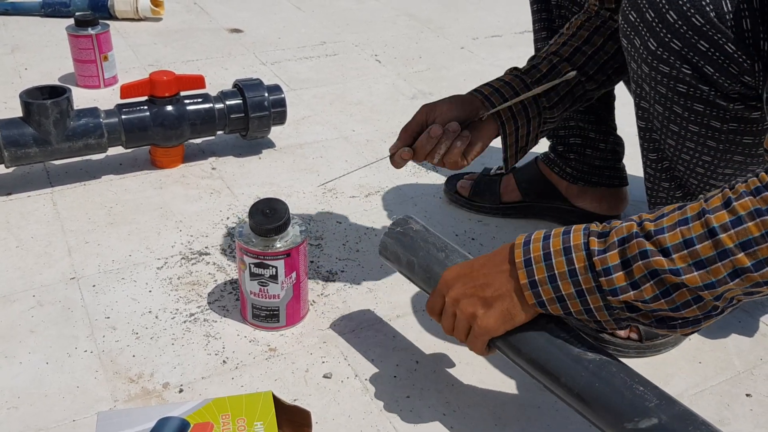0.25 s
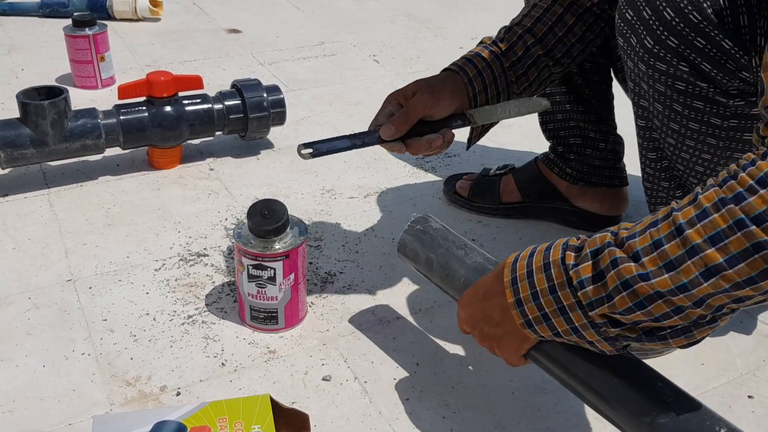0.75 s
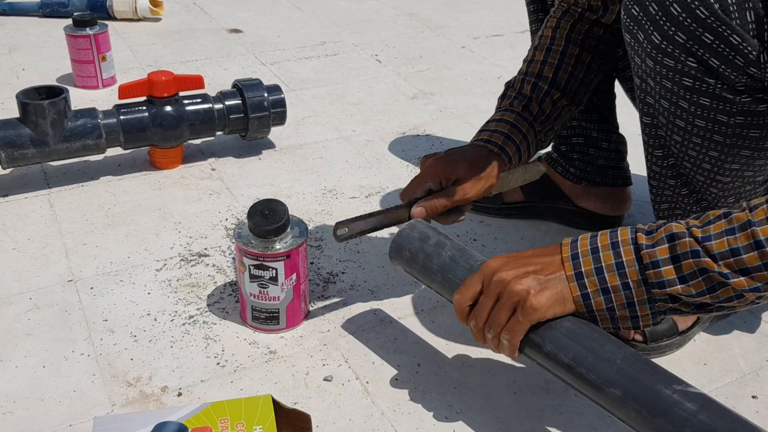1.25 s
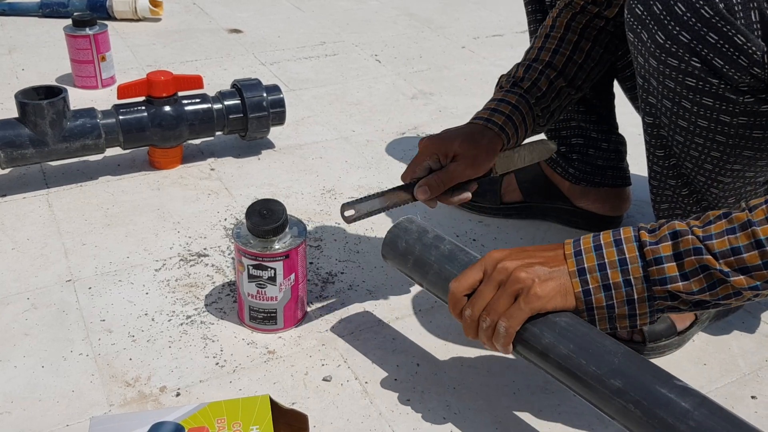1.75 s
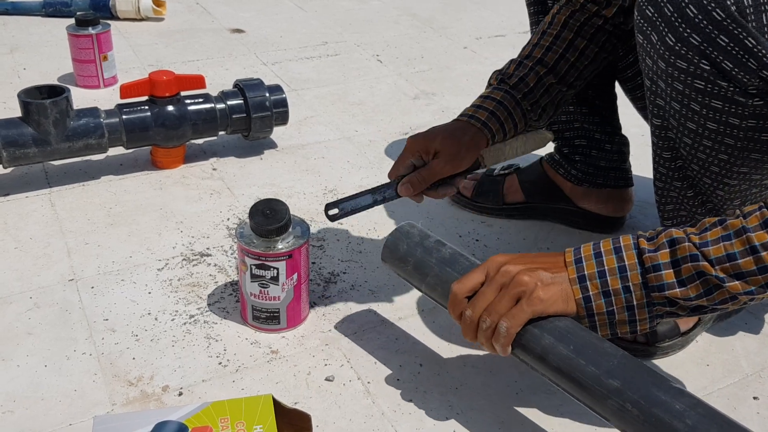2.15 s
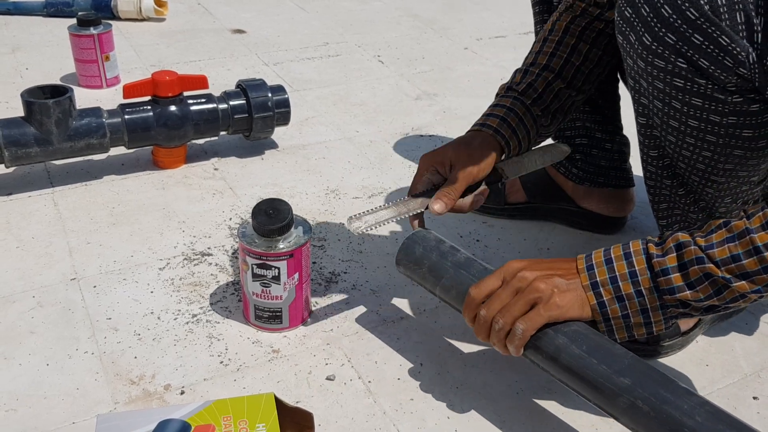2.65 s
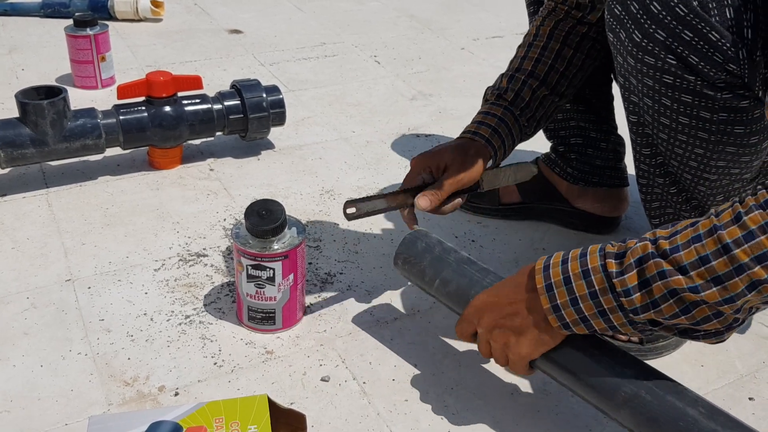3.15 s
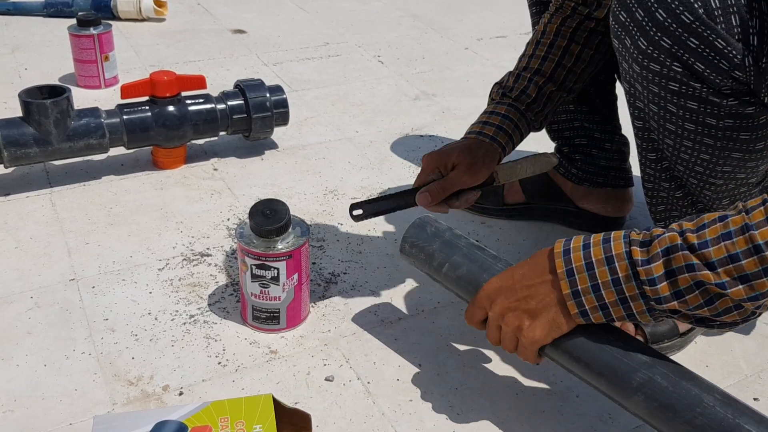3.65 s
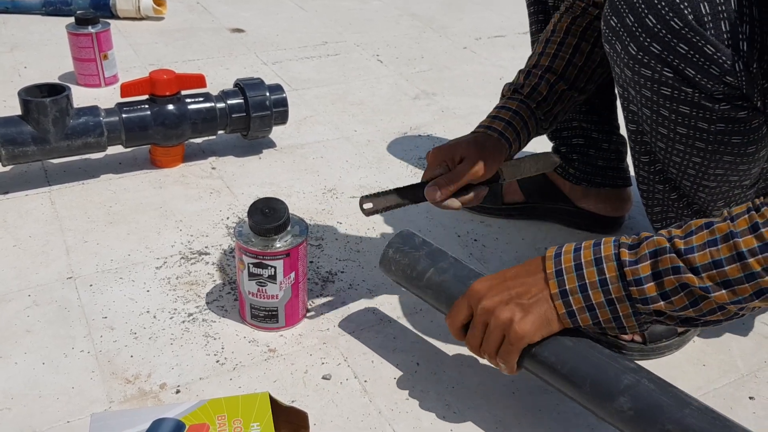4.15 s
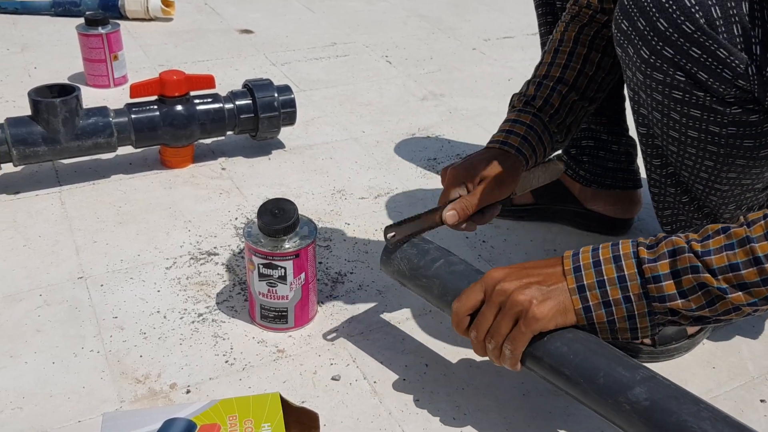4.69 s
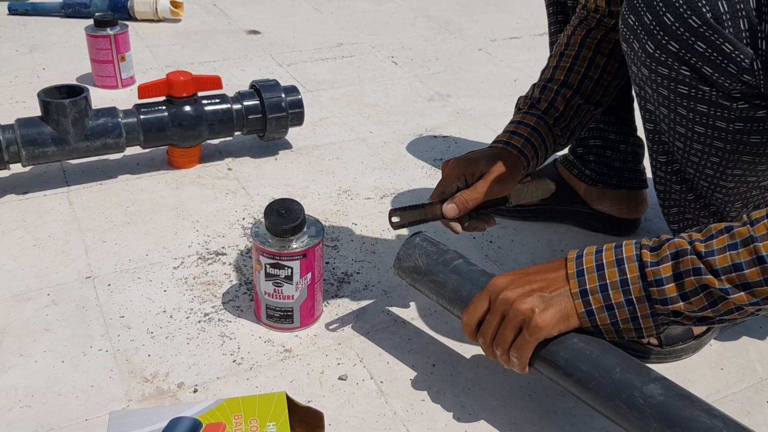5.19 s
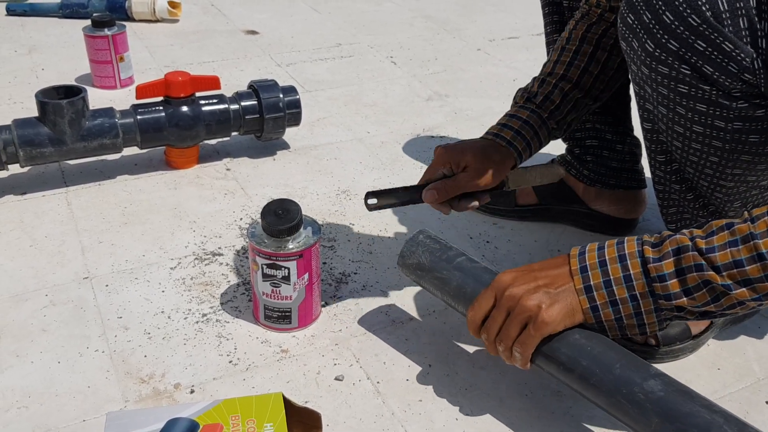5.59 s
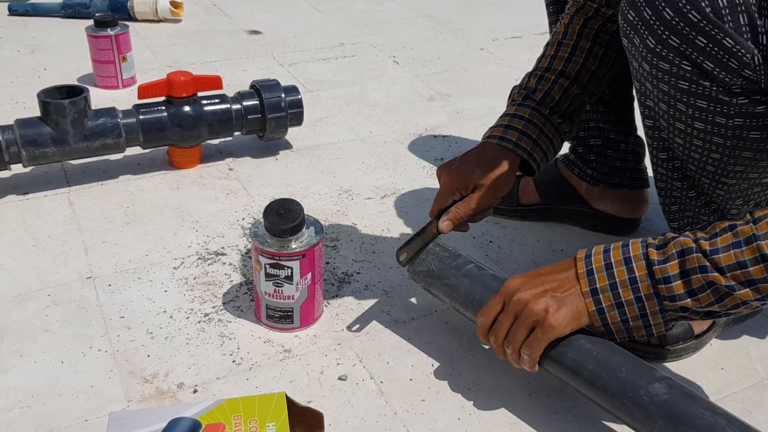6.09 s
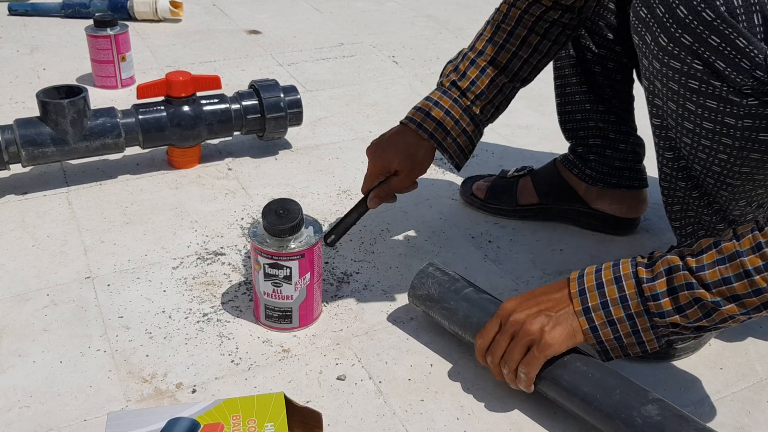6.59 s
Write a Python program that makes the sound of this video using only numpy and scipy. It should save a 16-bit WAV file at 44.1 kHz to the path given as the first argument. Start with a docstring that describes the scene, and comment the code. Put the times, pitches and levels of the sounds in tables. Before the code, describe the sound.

On an open rooftop, a loose saw blade deburrs a plastic pipe end. Each pass is a dull tap with a bright click, then a very short hissing scrape, sometimes a squeak and a thin metallic ring. The pipe clacks hollowly on concrete early and again near five seconds. Soft hand brushing, steady low hum and faint bird whistles lie around it. Close stereo microphone, slight short echo.

```python
"""Open rooftop: a loose hacksaw blade deburrs the sawn end of a plastic pipe.
The blade taps the rim, shaves it in noisy grains, at times squeaks, and rings as decaying modes once free.
The pipe knocks and booms on the concrete as filtered bursts and modes; a hand brushes along it.
Machine hum, fan drone, rumble and far hiss lie below; a distant bird gives falling, wavering sines."""
import sys
import numpy as np
from scipy import signal
from scipy.fft import rfft, irfft, next_fast_len
from scipy.io import wavfile
from scipy.ndimage import uniform_filter1d

SR = 44100
rng = np.random.default_rng(int(sys.argv[2]) if len(sys.argv) > 2 else 0)


def digitize_waveform(pressure):
    """Quantize a signal to 16-bit integers and store it at the path in sys.argv[1].

    Rows of a 2-D input are taken as channels; values are limited to [-1, 1].
    """
    field = np.atleast_2d(pressure).T
    bounded = np.clip(field, -1, 1)
    quanta = np.round(bounded * 32767).astype(np.int16)
    wavfile.write(sys.argv[1], SR, quanta)


N = 301203
TIME_S = np.arange(N) / SR


def undb(db):
    """Amplitude ratio from dB."""
    return 10 ** (np.asarray(db) / 20)


def unit(x):
    """Scale to an rms of 1."""
    return x / np.sqrt(np.mean(x ** 2))


def span(length_s):
    """Sample times from 0, in s."""
    return np.arange(int(length_s * SR)) / SR


def curve(rows):
    """Straight lines through (t/s, value) rows."""
    return np.interp(TIME_S, *np.transpose(rows))


def add(out, start_s, x, pan_db=0):
    """Mix x in at start_s; pan_db is left minus right."""
    i = max(int(start_s * SR), 0)
    x = x[..., :N - i]
    out[:, i:i + x.shape[-1]] += x * undb(np.array([[pan_db], [-pan_db]]) / 2)


def colour(x, points, tilt_db=0):
    """Minimum-phase filter through (f/Hz, level/dB) points, tilted by tilt_db per octave."""
    n = 2 * next_fast_len(x.shape[-1])
    hz, db = np.transpose(points)
    octave = np.log2(np.maximum(np.fft.rfftfreq(n, 1 / SR), 1))
    octaves_below = np.maximum(np.log2(hz[0]) - octave, 0)
    tilted_db = db + tilt_db * np.log2(hz / hz.mean())
    gain_db = np.interp(octave, np.log2(hz), tilted_db) - 10 * octaves_below
    # folding the cepstrum makes the filter causal
    cepstrum = irfft(np.log(undb(gain_db)))
    cepstrum[1:n // 2] *= 2
    cepstrum[n // 2 + 1:] = 0
    return irfft(rfft(x, n) * np.exp(rfft(cepstrum)))[..., :x.shape[-1]]


def walk(rate_hz, n):
    """Smooth random wander, rms near 1, a new target rate_hz times a second."""
    k = max(int(SR / rate_hz), 1)
    steps = np.repeat(rng.standard_normal(n // k + 3), k)
    return unit(uniform_filter1d(steps, k))[k:n + k]


def air(n, bass_width=0.26, wide_hz=1100):
    """Stereo noise: alike in the bass, unrelated in the treble."""
    mid, side = rng.standard_normal((2, n))
    hz = np.fft.rfftfreq(n, 1 / SR)
    side = irfft(rfft(side) * np.minimum(bass_width + (hz / wide_hz) ** 2, 1), n)
    return np.array([mid + side, mid - side])


def fade(t, t60_s):
    """Exponential decay, -60 dB at t60_s."""
    return np.exp(-np.log(1000) * t / t60_s)


def ring(modes, t, scatter, spread_rad):
    """Decaying modes, slightly detuned; neighbours swing in opposite senses, channels out of phase."""
    out = 0
    for k, (hz, db, t60_s) in enumerate(modes):
        sign = (-1) ** k
        lag_rad = sign * spread_rad * np.array([[1], [-1]])
        detuned_hz = hz * (1 + scatter * rng.standard_normal())
        out = out + sign * undb(db) * fade(t, t60_s) * np.sin(2 * np.pi * detuned_hz * t + lag_rad)
    return out


def blow(x, db):
    """Set the rms of the first 5 ms."""
    return x * undb(db) / np.sqrt(np.mean(x[:, :SR // 200] ** 2))


def crack(t, t60_s, tail_db, tail_t60_s, snap=0):
    """Contact: a one-sample push, a short noise burst and its scatter inside the pipe."""
    return snap * (t == 0) + air(len(t)) * (fade(t, t60_s) + undb(tail_db) * fade(t, tail_t60_s))


# machine hum: f/Hz, level/dB, unsteadiness
HUM_TONES = [(99, -42, 0.44), (79, -49, 0.4), (194.6, -45.5, 0.19), (246.1, -55, 0.54), (492, -68, 1)]
# fan drone spectrum: f/Hz, level/dB
DRONE_SPECTRUM = [(100, -32.5), (170, 1), (215, 4), (250, 7.5), (300, 4), (400, -19), (470, -4),
                  (600, -26.5), (720, -4), (1100, -36.5)]
# fan drone: t/s, level/dB
DRONE_LEVEL = [(0, -45), (1.14, -42.5), (3.1, -49), (4.2, -44), (5.8, -47.5), (6.83, -47)]
# low rumble before swells: t/s, level/dB
RUMBLE_LEVEL = [(0, -43), (1, -46.5), (3.6, -50), (3.9, -41.5), (4.3, -36), (4.7, -47.5), (6.83, -52.5)]
# town noise spectrum: f/Hz, level/dB
TOWN_SPECTRUM = [(22, -21), (40, -7), (70, -1.5), (120, -2.5), (150, -8), (210, -3.5), (430, -16.5),
                 (720, -18.5), (1150, -26.5), (1500, -33), (2100, -34), (2700, -49.5), (6000, -60),
                 (16000, -83)]
# distant hiss spectrum: f/Hz, level/dB
HISS_SPECTRUM = [(2000, 3), (3000, 2), (4500, 0.5), (6500, -0.5), (9000, -7), (14000, -13), (16000, -25)]
# distant hiss: t/s, level/dB
HISS_LEVEL = [(0, -60.3), (2, -61.8), (3.5, -63.3), (6.83, -62.3)]
RUMBLE_SWELL_DB, RUMBLE_SWELL_HZ = 2, 10


def background():
    """Motors hum as wavering sines under fan drone; rumble swells, the town hisses far off."""
    hum = 0
    for hz, db, unsteady in HUM_TONES:
        sway = 1 + unsteady * (walk(11, N) + 1j * walk(12, N))
        hum = hum + undb(db) * unit(np.real(sway * np.exp(2j * np.pi * hz * TIME_S)))
    drone = unit(colour(air(N), DRONE_SPECTRUM)) * undb(curve(DRONE_LEVEL))
    rumble_points = [(22, -18), (42, -8), (62, 3), (85, 0), (140, -5.5), (400, -80), (2000, -101)]
    rumble = unit(colour(air(N, bass_width=0.43), rumble_points))
    rumble *= undb(curve(RUMBLE_LEVEL) + RUMBLE_SWELL_DB * walk(RUMBLE_SWELL_HZ, N))
    town = unit(colour(air(N), TOWN_SPECTRUM)) * undb(-43)
    hiss = unit(colour(air(N), HISS_SPECTRUM)) * undb(curve(HISS_LEVEL))
    lean_left = undb(np.array([[1], [-1]]))
    return (hum + rumble) * lean_left + drone + town + hiss


# bird whistles: t/s, level/dB
WHISTLES = [(.07, -57.5), (.935, -57.5), (1.91, -55), (2.71, -55.5), (3.75, -62)]
WHISTLE_S, WHISTLE_FROM_HZ, WHISTLE_TO_HZ = .16, 4850, 3850


def bird():
    """Thin falling sines, loudest near the start, blurred in pitch and broken in level by distance."""
    out = np.zeros((2, N))
    t = span(WHISTLE_S)
    n = len(t)
    for start_s, db in WHISTLES:
        glide_hz = np.interp(t, [0, WHISTLE_S], [WHISTLE_FROM_HZ, WHISTLE_TO_HZ])
        hz = glide_hz + 150 * np.array([walk(600, n), walk(600, n)])
        flutter = unit(undb(4.5 * walk(90, n)))
        swell = np.sin(np.pi * np.sqrt(t / WHISTLE_S))
        tone = np.sin(2 * np.pi * np.cumsum(hz, axis=1) / SR)
        add(out, start_s, undb(db) * flutter * swell * tone)
    return out


# hand slides on the pipe: t/s, length/s, level/dB before the swell
SLIDES = [(0.195, 0.51, -56.5), (0.672, .23, -54.5), (2.6, 0.24, -59), (2.816, .37, -56.5),
          (4.939, 0.19, -46), (5.28, 0.11, -59)]


def hand():
    """A palm brushes along the pipe: bright, uneven noise that swells and fades."""
    out = np.zeros((2, N))
    for start_s, length_s, db in SLIDES:
        t = span(length_s)
        uneven = air(len(t)) * undb(2.5 * walk(115.4, len(t)))
        brush = colour(uneven, [(1500, -22), (6500, 4.5), (15000, 3)])
        add(out, start_s, undb(db) * unit(brush) * np.sin(np.pi * t / length_s))
    return out


# pipe meets concrete: t/s, clack level/dB, body level/dB, gap between contacts/s, clack loss per contact/dB
KNOCKS = [(.2867, -15.5, -20.5, .017, 9), (.366, -40, -33, .015, 7), (.484, -42.5, -70, .035, 9.5),
          (5.027, -13, -21.5, .0355, 11.5)]
BODY_LOSS_SHARE = 0.74  # body loss per contact / clack loss
CLACK_TILT_DB_PER_OCT, ROCK_TILT_DB_PER_OCT = 0.8, -2.5  # first contact; change at each further one


def contacts(count):
    """The pipe rocks to rest, each contact weaker and duller: (t/s, clack/dB, body/dB, tilt/dB per octave)."""
    rows = []
    for start_s, clack_db, body_db, gap_s, loss_db in KNOCKS:
        for k in range(count):
            tilt_db = CLACK_TILT_DB_PER_OCT + k * ROCK_TILT_DB_PER_OCT
            body_loss_db = k * loss_db * BODY_LOSS_SHARE
            rows.append((start_s + k * gap_s, clack_db - k * loss_db, body_db - body_loss_db, tilt_db))
    return rows


# clack spectrum: f/Hz, level/dB
CLACK_SPECTRUM = [(250, -30.5), (600, -15.5), (1000, -6), (1400, -14), (1750, 0), (2200, 4), (2600, -10.5),
                  (3100, -10), (3600, -18), (4500, -7.5), (5500, -21.5), (8000, -23), (15000, -38)]
# hollow pipe body modes: f/Hz, level/dB, t60/s
BODY_MODES = [(200, -4, 0.13), (321.5, 8.5, 0.074), (396, 2, 0.072), (457, 1, 0.1), (555, 2, 0.053),
              (674, 3.5, 0.069), (942, -2.5, 0.076), (1404, 4.5, 0.059), (1645, 4.5, 0.048)]
# pipe set down softly: t/s, level/dB
BUMPS = [(6.752, -25), (6.804, -27)]
# pipe bore modes: f/Hz, level/dB, t60/s
BORE_MODES = [(321, 6, 0.09), (392, -8, 0.059), (265, 2, .05), (209, -7, .06)]
# dull thuds as weight shifts: t/s, level/dB
THUDS = [(.380, -22), (2.83, -29), (4.534, -22.5)]
# roof slab modes: f/Hz, level/dB, t60/s
SLAB_MODES = [(42.2, 0, .15), (63.4, -2.5, 0.18), (98, 0, 0.11)]


def knocks():
    """Pipe clacks on concrete, its body answers 2 ms later; soft bumps boom the bore, thuds the slab."""
    out, t = np.zeros((2, N)), span(.35)
    for start_s, clack_db, body_db, tilt_db in contacts(count=6):
        clack = crack(t, t60_s=0.029, tail_db=-21, tail_t60_s=0.28, snap=9.4)
        add(out, start_s, blow(colour(clack, CLACK_SPECTRUM, tilt_db), clack_db), pan_db=-1.0)
        body = ring(BODY_MODES, t, scatter=0.05, spread_rad=0.82) * np.minimum(t / 0.0027, 1)
        add(out, start_s + 0.001935, blow(body, body_db))
    for start_s, db in BUMPS:
        boom = ring(BORE_MODES, t, scatter=0.0097, spread_rad=0.16) * np.minimum(t / 0.00076, 1)
        add(out, start_s, blow(boom, db))
    for start_s, db in THUDS:
        thud = ring(SLAB_MODES, t, scatter=.03, spread_rad=0.54) * np.minimum(t / 0.0058, 1)
        add(out, start_s, undb(db) * thud)
    return out


# blade lands on the rim: t/s, level/dB, click re level/dB, rim tilt/dB per octave
TAPS = [(.135, -18.5, -8.5, -7), (1.236, -22.5, -8, -1.5), (1.564, -19.5, -0.5, 3),
        (1.905, -21.5, -8.5, 6.5), (2.38, -21, -2.5, 6), (3.478, -25.5, -10, -4.5), (3.845, -25, -4.5, -3),
        (4.304, -25.5, -2, -1.5), (4.754, -26, -1, 4), (5.392, -26, -6, 0.5), (5.766, -18.5, -5.5, 4.5),
        (6.125, -21, -1.5, 6.5), (6.475, -14, -10.5, 13.5), (6.753, -33, 5.5, 5)]
# pipe rim modes before tilt: f/Hz, level/dB, t60/s
RIM_MODES = [(512, -8, 0.056), (795, 0.5, 0.038), (1130, 3, 0.041), (1474, 4, 0.031), (1762, 1.5, 0.03),
             (2140, 3, 0.021), (2570, -26, 0.007), (3400, -16.5, 0.034)]
# metallic click spectrum: f/Hz, level/dB
CLICK_SPECTRUM = [(900, -15), (2500, -1), (4000, -3), (5200, 6), (6800, -0.5), (7900, 2), (9000, -2.5),
                  (10500, 5.5), (12500, -8.5), (16000, -4)]
# pipe wall spectrum, also used by shave(): f/Hz, level/dB
WALL_SPECTRUM = [(600, -5.5), (1200, -8), (1600, -5.5), (2150, 3.5), (2700, -2), (3500, -6), (5000, -21),
                 (9000, -33)]


def taps():
    """Steel on plastic: bright click, dull rim modes, trace of blade; rim and wall again at each slip-off."""
    out, t = np.zeros((2, N)), span(0.31)
    for start_s, db, click_db, tilt_db in TAPS:
        modes = [(hz, mode_db + tilt_db * np.log2(hz / 1500), t60_s) for hz, mode_db, t60_s in RIM_MODES]
        rim = ring(modes, t, scatter=0.061, spread_rad=0.8) * np.minimum(t / .0006, 1)
        click = crack(t, t60_s=0.0061, tail_db=-2.0, tail_t60_s=0.032, snap=1.9)
        click = blow(colour(click, CLICK_SPECTRUM), click_db)
        steel = undb(click_db - 35) * ring(BLADE_MODES, t, scatter=0.00027, spread_rad=0.63)
        add(out, start_s + 0.00046, undb(db) * (blow(rim, -8.0) + click + steel), pan_db=-2.5)
    # the blade drops off the edge as each cut ends
    for start_s, length_s, *_, slip_db, _ in STROKES:
        wall = colour(crack(t, t60_s=0.018, tail_db=3, tail_t60_s=0.06), WALL_SPECTRUM)
        rim = ring(RIM_MODES, t, scatter=0.066, spread_rad=0.77)
        add(out, start_s + length_s, undb(slip_db) * (blow(wall, -6) + blow(rim, -7.5)))
    return out


# steel blade modes: f/Hz, level/dB, t60/s
BLADE_MODES = [(5716, 1, 0.34), (4050, -30, 0.33), (4610, -26, .27), (5155, -25, 0.046), (7230, -31, .29),
               (7950, -24, 0.09), (10740, -25, 0.21)]
RING_AFTER_S = -.001  # re end of stroke
FIRST_RING_S, FIRST_RING_DB = 0.0069, -53.5  # faint ring as the scene opens


def blade():
    """Clear of the rim, nothing damps the steel and its modes ring out."""
    out, t = np.zeros((2, N)), span(.4)
    releases = [(FIRST_RING_S, FIRST_RING_DB)]
    for start_s, length_s, *_, ring_db in STROKES:
        releases.append((start_s + length_s + RING_AFTER_S, ring_db))
    for start_s, db in releases:
        free = ring(BLADE_MODES, t, scatter=0.00051, spread_rad=0.44) * np.minimum(t / 0.015, 1)
        add(out, start_s, undb(db) * free, pan_db=-6.5)
    return out


# edge squeaks: t/s, length/s, level/dB, lowest nominal f/Hz, place of that low/share of length
SQUEAKS = [(1.281, 0.022, -20, 4600, 0.49), (2.077, 0.048, -20.5, 4345, 0.04),
           (3.562, 0.027, -27, 4400, .4), (3.99, 0.026, -22, 6000, 0), (4.475, 0.027, -18.5, 4920, .1),
           (5.866, .012, -28, 4400, 0.11), (6.514, .018, -23.5, 5500, 0.07)]
# every squeak climbs ever faster to the same nominal pitch, held from this share of its length
SQUEAK_END_HZ, SQUEAK_BEND, SQUEAK_TOP_AT = 7670, 1.5, .85


def squeaks():
    """The biting edge sticks and slips: a rough three-partial tone gliding with stroke speed."""
    out = np.zeros((2, N))
    for start_s, length_s, db, low_hz, low_at in SQUEAKS:
        t = span(length_s)
        n = len(t)
        climb = np.abs((t / length_s - low_at) / (SQUEAK_TOP_AT - low_at))
        speed = np.minimum(climb, 1) ** SQUEAK_BEND
        jitter = 1 + .035 * walk(2500, n) + .01 * walk(200, n)
        hz = low_hz * (SQUEAK_END_HZ / low_hz) ** speed * jitter
        phase = 2 * np.pi * np.cumsum(hz) / SR + np.array([[.5], [-.5]]) * walk(158, n)
        tone = 0
        for k in range(1, 4):
            below_nyquist = k * hz < SR / 2
            tone = tone + undb(-6 * (k - 1)) * np.sin(k * phase) * below_nyquist
        rough = unit(tone * undb(2.1 * walk(453, n)))
        add(out, start_s, undb(db) * rough * np.sqrt(np.sin(np.pi * t / length_s)), pan_db=-3.0)
    return out


# scrape spectrum before tilt: f/Hz, level/dB
SCRAPE_SPECTRUM = [(1000, -46), (3000, -27.5), (3900, -8), (4600, -1), (5200, -0.5), (6200, 3.5),
                   (7000, -2), (7750, 1), (8400, 0), (9200, 0), (10000, 2.5), (11000, 3), (13500, -2.5),
                   (16000, -12.5)]
# pressure builds from a light touch, sags, and lets go around the end of the stroke
RELEASE_S, TOUCH_DB, SAG_DB = .017, -25, -1.3


def shave(length_s, rise_s, tilt_db, wall_db):
    """The edge shaves plastic in dense noise grains that hiss in the blade and rasp in the pipe wall."""
    t = span(length_s + .4 * RELEASE_S)
    n = len(t)
    speed = t / t[-1]
    press = np.clip(np.minimum(t / rise_s, (t[-1] - t) / RELEASE_S), 0, 1)
    force = (undb(TOUCH_DB) + (1 - undb(TOUCH_DB)) * press) * undb(SAG_DB * speed)
    grains = rng.standard_normal((2, n)) + .5 * rng.standard_normal(n)
    grains *= undb(2.0 * walk(3000, n) + 2.0 * walk(251, n))
    # each stroke presses the blade at another spot, which shifts its resonances
    bands_hz = np.geomspace(1000, 16000, 70)
    grains = colour(grains, np.transpose([bands_hz, 2.5 * rng.standard_normal(len(bands_hz))]))
    # hiss brightens as the stroke speeds up
    slow = unit(colour(grains, SCRAPE_SPECTRUM, tilt_db - 2.2))
    fast = unit(colour(grains, SCRAPE_SPECTRUM, tilt_db + 2.2))
    rasp = undb(wall_db) * unit(colour(grains, WALL_SPECTRUM))
    return force * ((1 - speed) * slow + speed * fast + rasp)


# edge cuts until it slips off the rim: t/s, length/s, rise/s, level/dB, tilt/dB per octave,
# wall rasp re level/dB, slip level/dB, free ring level/dB
STROKES = [ (.193, 0.032, 0.017, -24, 2.5, -23, -40, -66),
           (1.267, 0.044, 0.018, -21, 0.5, -28.5, -25.5, -41),
           (1.673, .014, .009, -17.5, 4, -39, -39.5, -51),
           (2.0679, 0.047, .005, -16.5, 0.5, -27, -35.5, -52),
           (2.428, 0.031, 0.017, -14.5, -0.5, -26, -30, -35), (3.558, 0.03, 0.01, -19, 0.5, -34, -27, -34),
           (3.981, 0.035, 0.0082, -20, 1.5, -25.5, -32, -39.5), (4.445, .045, .018, -16, -1, -23, -27, -23),
           (4.847, .014, 0.0078, -21.5, -2, -11.5, -28.5, -36),
           (5.479, .025, 0.0094, -19.5, 2, -20, -27.5, -53),
           (5.865, .023, 0.013, -22.5, 1, -20, -40, -39.5),
           (6.135, 0.034, 0.022, -22, 6.5, -22.5, -29.5, -50.5),
           (6.510, 0.027, 0.012, -19.5, 4, -18, -30.5, -36)]
# blade skates over the rim without biting: t/s, length/s, rise/s, level/dB
SKIDS = [(0.177, 0.019, .008, -37.5), (2.419, .012, .003, -27), (3.531, 0.028, 0.015, -36),
         (4.808, 0.035, .004, -27.5), (5.441, .036, 0.021, -25.5), (5.801, 0.02, .003, -34),
         (5.844, 0.03, .006, -33)]
SKID_TILT_DB_PER_OCT, SKID_WALL_DB = -6.5, -9  # duller and raspier than most cuts


def scrapes():
    """Firm cuts along the rim, and light skids that lead into some of them."""
    out = np.zeros((2, N))
    for start_s, length_s, rise_s, db, tilt_db, wall_db, *_ in STROKES:
        add(out, start_s, undb(db) * shave(length_s, rise_s, tilt_db, wall_db), pan_db=-3.0)
    for start_s, length_s, rise_s, db in SKIDS:
        skid = shave(length_s, rise_s, SKID_TILT_DB_PER_OCT, SKID_WALL_DB)
        add(out, start_s, undb(db) * skid, pan_db=-3.0)
    return out


ROOF_T60_S, ROOF_DB = .3, -15.5  # T60 before the extra treble decay; total echo energy


def rooftop(x):
    """Slab and parapets return a short, thin noise scatter whose top dies first."""
    t = span(0.54)
    echo = air(len(t)) * fade(t, ROOF_T60_S) * np.minimum(t / 0.0018, 1)
    dull = signal.sosfilt(signal.butter(1, 6000, fs=SR, output="sos"), echo)
    echo = dull + (echo - dull) * fade(t, 0.28)
    echo *= undb(ROOF_DB) / np.sqrt(np.sum(echo ** 2) / 2)
    return x + signal.fftconvolve(x, echo, axes=1)[:, :N]


def scene():
    """Work on the pipe with rooftop echo, over dry bird and background."""
    work = hand() + knocks() + taps() + blade() + squeaks() + scrapes()
    return background() + bird() + rooftop(work)


TOP_HZ = 15800


def record(dry):
    """Steep low-pass at TOP_HZ."""
    return signal.sosfilt(signal.ellip(8, .2, 70, TOP_HZ, fs=SR, output="sos"), dry)


dry = scene()
out = record(dry)
digitize_waveform(out)
```